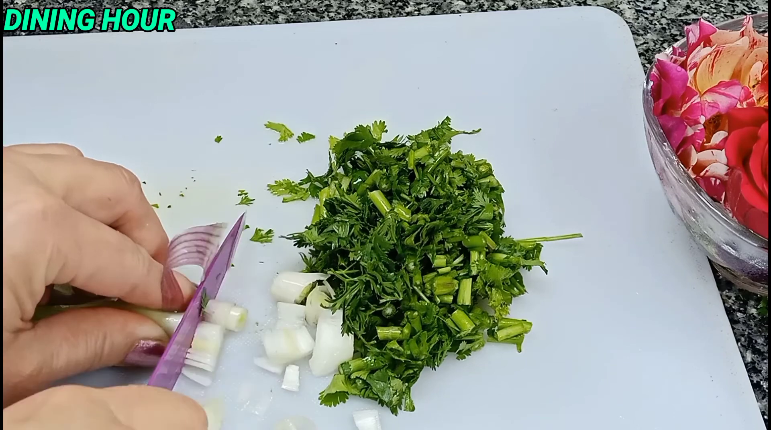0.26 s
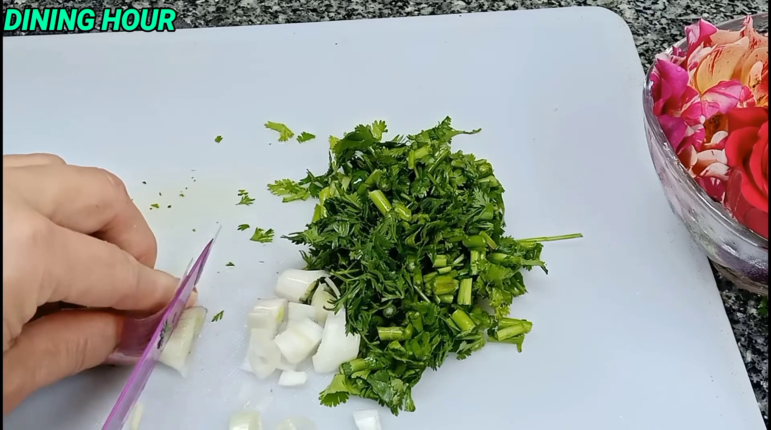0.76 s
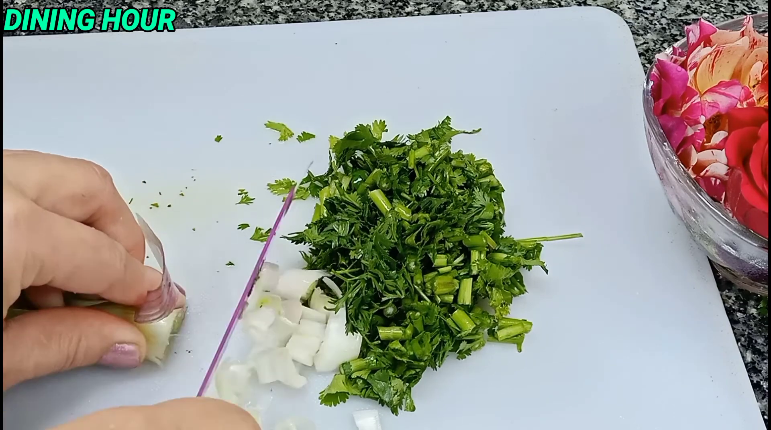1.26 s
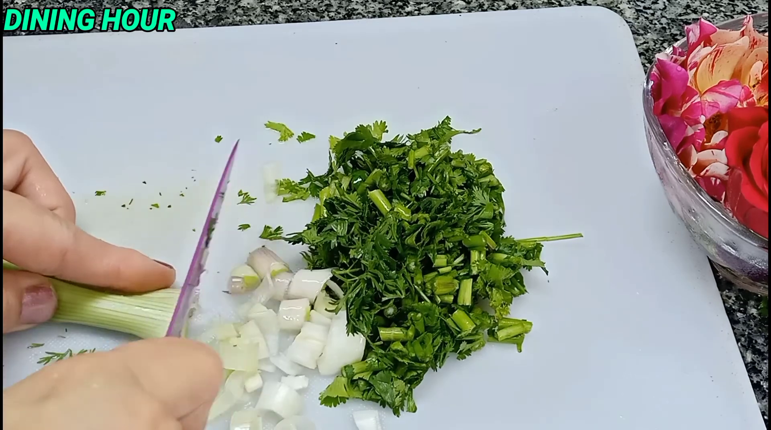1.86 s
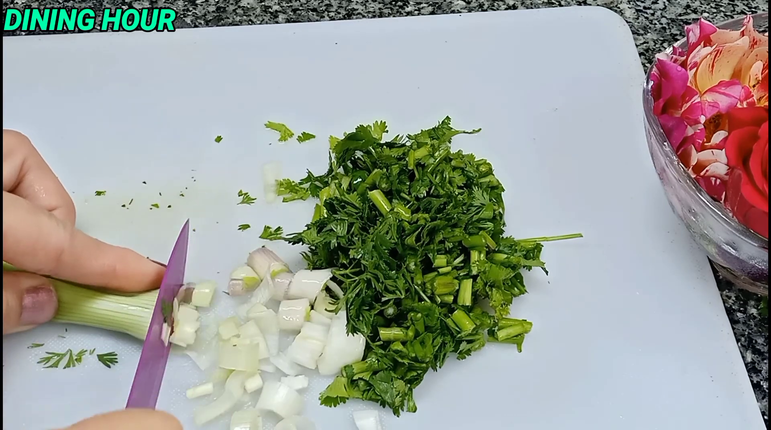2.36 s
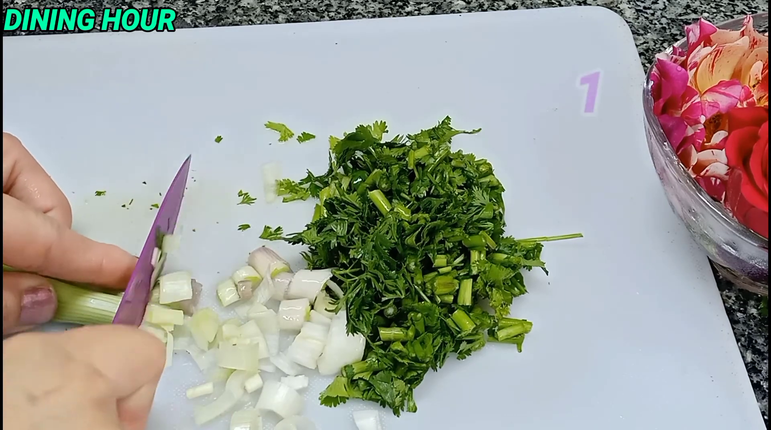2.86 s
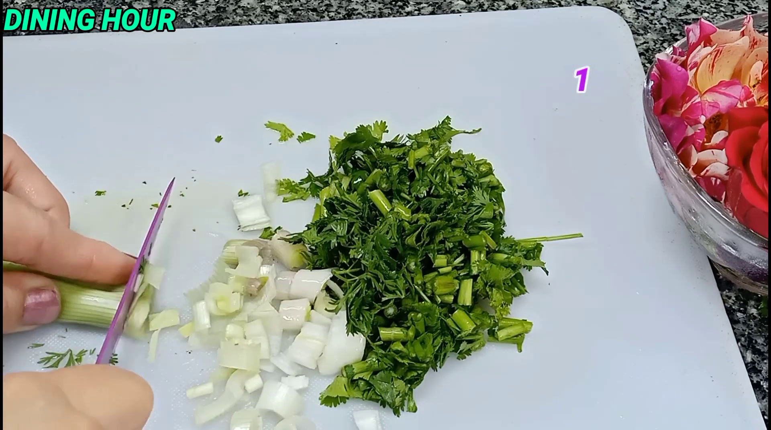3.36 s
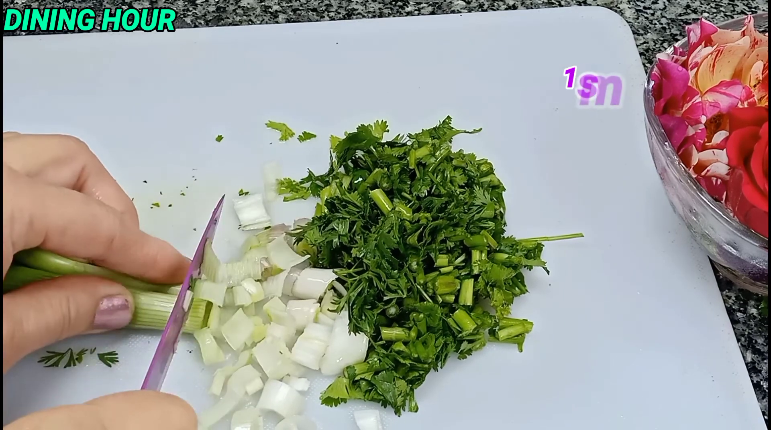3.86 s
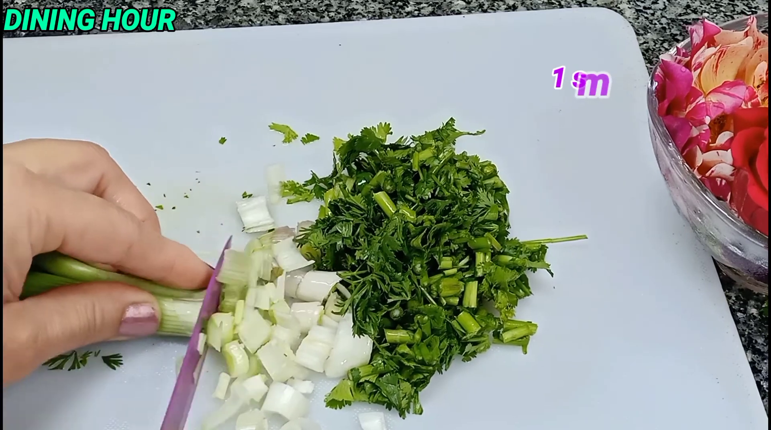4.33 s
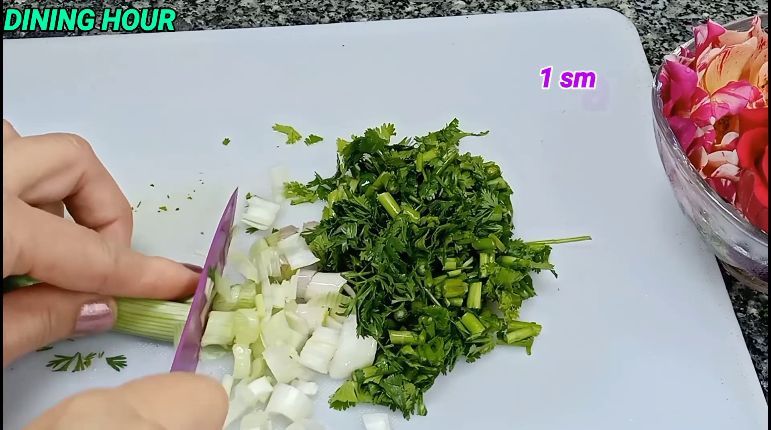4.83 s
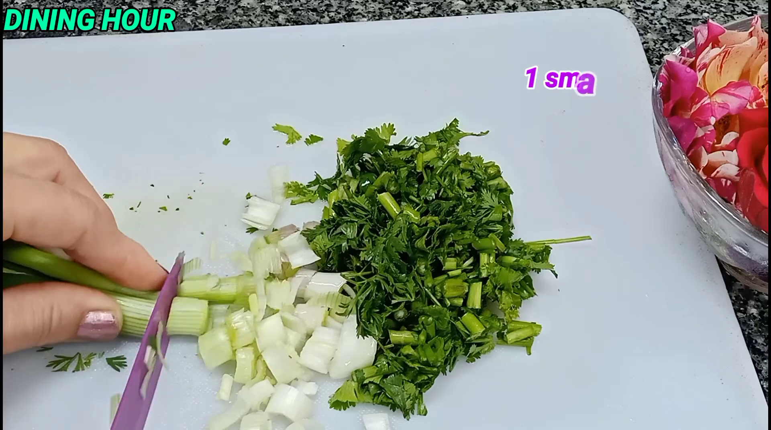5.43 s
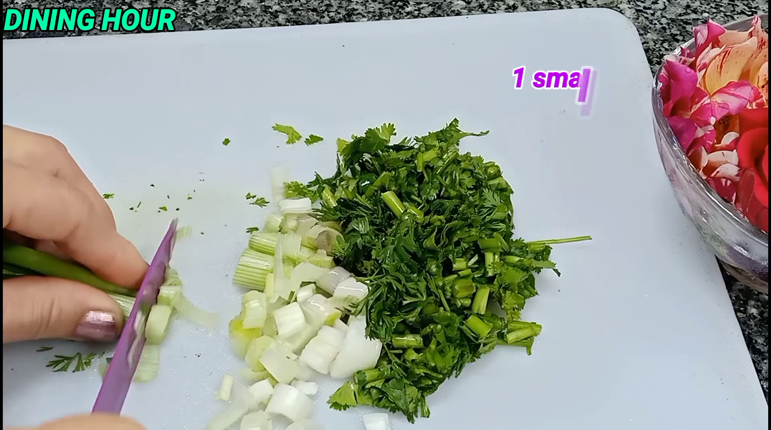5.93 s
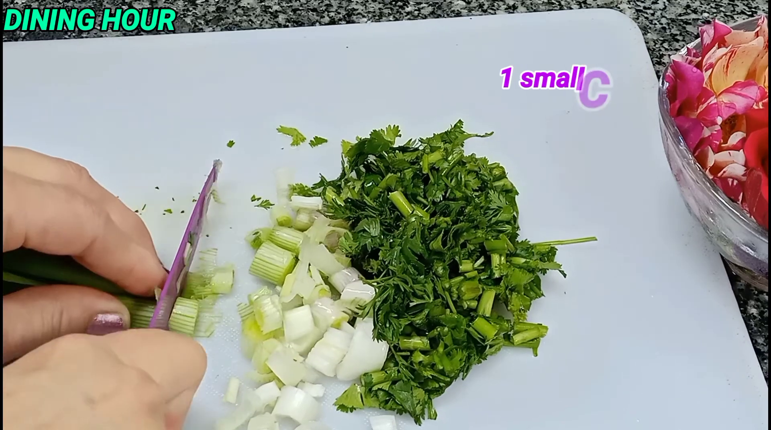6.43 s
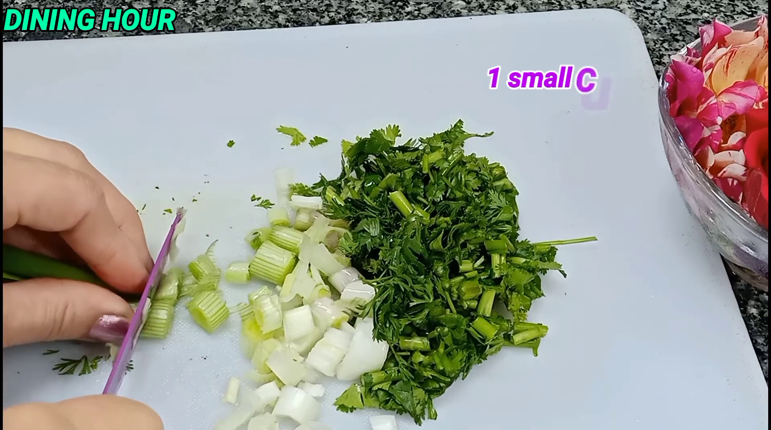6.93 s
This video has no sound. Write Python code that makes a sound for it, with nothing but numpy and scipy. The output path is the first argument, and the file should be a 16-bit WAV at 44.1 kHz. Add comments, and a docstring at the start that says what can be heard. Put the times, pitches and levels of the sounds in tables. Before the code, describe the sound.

A close stereo pickup in a small, hard kitchen, with quick reflections, a short tail, faint air and a low wavering hum. A light scrape at the very start leads to a crisp, crunchy cut with a hollow pop at 0.3 s and a softer, juicy one at 0.95. Scrapes follow at 0.6 and 1.3, then light rustles and ticks around 1.7 to 1.9. Cuts at 2.2, 2.9 and 4.2 end in sharp, bright knocks on plastic; the one at 3.5 snaps and pops hollowly. The loudest gritty squeak comes at 3.8, and the holding hand rumbles very faintly near 4. Steadier crunchy strokes follow at 4.7, 5.3, 5.9, 6.5 and 7.05, the 6.5 one strongest, with a bright hollow pop. Short scrapes at 5.6 and 6.2 and soft onion-skin rustles fill the gaps; the last cut lands just before the end.

```python
"""A knife slices spring onions on a plastic board: skin snaps and wet layers crunch as filtered bursts of noise.
Sine waves make the thud of the board and the pop of hollow stalks; short noise bursts make three sharp knocks.
Between cuts the edge grates as showers of clicks and squeaks as a ringing slip train; slices rustle.
The holding hand rumbles on the board. A small, hard kitchen adds close echoes and a dense noise tail.
Behind it all lie faint air noise and a low, wavering hum, both made of filtered noise."""
import sys
import numpy as np
from scipy import signal
from scipy.fft import rfft, irfft
from scipy.io import wavfile
from scipy.ndimage import uniform_filter1d

SR = 44100
rng = np.random.default_rng(int(sys.argv[2]) if len(sys.argv) > 2 else 0)


def wrap_up_sound(samples):
    """Save the sound to the file named by the first command line argument, as 16-bit audio."""
    columns = np.atleast_2d(samples).T
    # keep every value between -1 and 1, then stretch to whole-number steps
    tamed = np.clip(columns, -1, 1)
    steps = np.round(tamed * 32767).astype(np.int16)
    wavfile.write(sys.argv[1], SR, steps)


N = 317123  # length in samples

# Source levels below are those before the balance set in scene(). Colours give relative levels.
# The cuts. Each row: skin snap in seconds, blade landing in seconds, pressing time before the snap in seconds,
# pressing in dB, snap in dB, tearing in dB, landing snap in dB, landing crunch in dB,
# crunch hold time in seconds, landing thud in dB, juiciness in dB.
CUT_STROKES = [(.301, 0.3114, 0.11, -54.5, -22, -34, -19.5, -27, 0.027, -49.5, -2.5),
               (.951, 0.955, 0.1, -43.5, -19, -25, -29, -28, 0.023, -41, 0.5),
               (2.215, 2.227, .13, -43.5, -29, -27, -26.5, -28, 0.0063, -40.5, 3),
               (2.868, 2.881, 0.089, -42.5, -22.5, -27, -22.5, -40, 0.0032, -42.5, 2),
               (3.504, 3.524, 0.11, -48, -22, -36, -18.5, -23.5, 0.0043, -37, -3),
               (4.1868, 4.227, .15, -43, -24, -29.5, -29, -27.5, 0.0049, -40, -1),
               (4.7054, 4.735, 0.07, -41, -22, -34, -24, -28, .012, -45, 2),
               (5.26, 5.282, .11, -47.5, -27, -43, -19.5, -29, 0.024, -41.5, 2.5),
               (5.864, 5.8955, 0.043, -44.5, -27.5, -44.5, -18, -31.5, 0.031, -44.5, -1.5),
               (6.4814, 6.501, 0.078, -45.5, -20.5, -46, -15, -24.5, 0.021, -38.5, -5),
               (7.0534, 7.061, 0.14, -43.5, -19.5, -28.5, -20.5, -27.5, 0.026, -48.5, -4.5)]
# Colour of the bursting skin as the board answers. Each row: frequency in Hz, level in dB.
SNAP_BODY_COLOUR = [(30, -44.5), (100, -31), (250, -12), (480, -15.5), (760, -3), (920, -2.5), (1080, 3.5),
                    (1270, 0), (1500, -2.5), (2000, -0.5), (2750, 4), (4000, -7), (5500, -12.5),
                    (9000, -48)]
# Colour of the wet cells fizzing. Each row: frequency in Hz, level in dB.
FIZZ_COLOUR = [(2500, -22.5), (4500, -2), (5600, -7), (6600, 3), (7300, -2), (8300, -16.5), (10000, -27),
               (12300, -28.5), (14000, -25.5), (16000, -28.5)]
# Colour of the wet layers breaking. Each row: frequency in Hz, level in dB.
CRUNCH_COLOUR = [(30, -36), (100, -19), (260, -14), (600, -4), (950, -0.5), (1270, 3.5), (1550, 1.5),
                 (2600, 3.5), (4000, -2), (5500, -6), (6800, 0), (8300, -14), (10000, -21), (12300, -26.5),
                 (15000, -21)]
# Low modes of the board on the counter. Each row: frequency in Hz, level in dB, time to fall 60 dB in seconds.
BOARD_MODES = [(137.2, -2, 0.17), (156.8, 3.5, 0.12), (179.8, -2.5, .1), (308, -13, 0.21)]
# Short rings of blade and board under a cut. Each row: frequency in Hz, width in Hz, level in dB.
CUT_RINGS = [(389, 60, -5.5), (900, 74, -4.5), (1318, 39, -0.5), (2620, 260, -7)]
# Hollow stalks caving in under some cuts. Each row: start in seconds, level in dB, pitch in Hz.
STALK_POPS = [(.301, -29, 850), (.309, -32, 420), (3.505, -27, 930), (3.524, -33, 720), (6.501, -25, 1290)]
# Small snaps of single fibres and slices. Each row: start in seconds, level in dB.
FIBRE_TICKS = [(.263, -44), (1.66, -41), (1.774, -40), (2.486, -37.5), (3.133, -46), (3.499, -36),
               (3.671, -41.5), (4.029, -48), (5.578, -37.5), (6.408, -40.5)]
# The edge strikes the bare board. Each row: start in seconds, level in dB.
BOARD_KNOCKS = [(2.2295, -7.5), (2.8876, -8.5), (4.229, -11)]
# Colour of the edge striking plastic. Each row: frequency in Hz, level in dB.
KNOCK_COLOUR = [(30, -45), (100, -36), (300, -17), (580, -14), (850, -15.5), (1180, -8.5), (1300, -4),
                (1650, -1), (2050, 5), (2550, 3), (3500, -5.5), (5500, -14), (6900, -9.5), (9000, -30),
                (15000, -45.5)]
# The edge is dragged over the board to push slices aside, sometimes catching twice. Each row:
# start in seconds, hold time in seconds, level in dB, swell in dB, squeak pitch at the end of the hold in Hz.
BOARD_SCRAPES = [(.018, 0.033, -33.5, -2, 1070), (0.5952, 0.029, -25, 12, 1180),
                 (0.654, 0.022, -34, 3, 1184), (1.2842, 0.034, -29.5, 0, 1330),
                 (1.84, .014, -33.5, -3.5, 1623), (1.878, 0.03, -43.5, -2, 1340),
                 (2.57, .003, -32, 1, 1120), (3.1923, 0.042, -29, -0.5, 1496),
                 (3.779, .022, -25.5, 7.5, 1340), (3.822, 0.029, -18, 4, 1055),
                 (4.428, 0.082, -49.5, -3, 1030), (5.629, 0.039, -24.5, 7.5, 1316),
                 (6.16, 0.046, -34, 0, 1310), (6.22, 0.027, -25, 2, 1170)]
# Colour of the edge grating on plastic. Each row: frequency in Hz, level in dB.
SCRAPE_COLOUR = [(150, -43.5), (500, -33), (660, -14.5), (800, -21.5), (1030, -2.5), (1280, -0.5),
                 (1500, -11.5), (1720, 0), (2000, -9), (2400, -5), (3400, -15), (5200, -30), (6800, -27),
                 (10000, -65.5)]
# Stalk and slices rub on the rising blade and the fingers.
# Each row: peak in seconds, level in dB, rise and fall time in seconds, brightness in dB per octave.
SOFT_RUBS = [(.53, -41.5, 0.029, 1), (.75, -56, 0.0052, 8), (1.165, -41, 0.029, 2.5),
             (1.662, -36.5, .016, 1), (1.71, -37.5, 0.012, .5), (1.785, -43, 0.019, 1),
             (2.41, -40.5, 0.028, 3), (2.505, -39.5, .014, 4.5), (3.076, -37, 0.017, 2.5),
             (3.149, -45, 0.022, 2), (3.705, -37.5, 0.018, 1.5), (4.389, -41.5, 0.048, 1.5),
             (4.89, -49.5, 0.037, 5), (4.995, -42, 0.031, 3), (5.504, -41.5, 0.02, 0.5),
             (6.092, -36.5, .017, -1), (6.693, -37, .014, 0), (6.796, -36.5, 0.016, -2),
             (6.91, -49, 0.0086, 10)]
# Colour of rubbing onion skin. Each row: frequency in Hz, level in dB.
RUSTLE_COLOUR = [(150, -17), (450, -20), (800, -7.5), (1200, -0.5), (1700, 1.5), (2400, 3.5), (3500, -3.5),
                 (5300, -9.5), (7000, -6), (8300, -21.5), (10000, -27.5), (12300, -34), (15000, -28)]
# The holding hand shifts its weight on the board. Each row: peak in seconds, level in dB,
# rise time in seconds, fall time in seconds, brightness in dB per octave.
HAND_SHIFTS = [(3.97, -55, 0.044, 0.029, -8), (4.12, -53, 0.042, 0.13, -1.5), (4.36, -59, .07, 0.32, 2)]
# Colour of the hand on the board. Each row: frequency in Hz, level in dB.
HAND_COLOUR = [(30, -23), (60, -9.5), (80, 2.5), (125, -11), (200, -11.5), (320, -9.5), (600, -17),
               (2000, -60)]
# Reflections from counter, bowl and wall, one list for the left port and one for the right.
# Each row: delay in seconds, relative gain.
NEAR_ECHOES = [
    [(.00075, 0.3), (.0015, 0.78), (.00225, 0.69), (.00385, 0.25), (.0064, 0.16)],
    [(.0008, 0.25), (.002, 0.36), (.0032, 0.16), (.0056, 0.18), (.0069, 0.33)],
]
# How fast the kitchen tail dies. Each row: frequency in Hz, time to fall 60 dB in seconds.
TAIL_T60 = [(120, 0.31), (400, 0.47), (1100, 0.43), (2300, 0.39), (6500, 0.37), (12000, 0.29)]
# How strong the kitchen tail is. Each row: frequency in Hz, level in dB.
TAIL_LEVEL = [(120, -2), (400, -2), (1100, -4.5), (2300, -9), (6500, -7), (14000, -10.5)]
# How alike scattered sound is at the two ports. Each row: frequency in Hz, left-right likeness as a fraction.
LIKENESS = [(60, 1), (160, 0.95), (300, 0.77), (700, 0.09), (1400, 0.11), (16000, 0.046)]
# Difference in colour between the ports. Each row: frequency in Hz, left minus right in dB.
LEFT_MINUS_RIGHT = [(60, -3), (160, -0.5), (400, 3.5), (700, 3), (950, -0.5), (1400, 0.5), (4000, 0.5),
                    (5600, 3), (7000, 0), (10500, -4), (13500, -7)]
# Colour of the room air. Each row: frequency in Hz, level in dB.
AIR_COLOUR = [(25, -28), (60, -11.5), (100, -4), (170, -9), (400, -10.5), (1100, -17), (3000, -26),
              (7000, -22.5), (8500, -45.5), (16000, -69.5)]
# Colour of the hum. Each row: frequency in Hz, level in dB.
HUM_COLOUR = [(40, -47.5), (70, -9.5), (88, -7.5), (98, 6), (108, -11.5), (135, -13), (220, -54)]
# The hum wavers over time. Each row: time in seconds, level in dB.
HUM_CURVE = [(0.0, -74.5), (3.24, -73), (3.58, -63.5), (5.89, -68), (6.05, -64.5), (6.87, -70), (7.19, -65)]

HZ = np.fft.rfftfreq(4096, 1 / SR)  # frequency grid of the colour filters
OCTAVES = np.log2(np.clip(HZ, 700, 7000) / 2000)  # octaves from 2000 Hz, held flat outside 700 to 7000 Hz
PRESS_SWELL_DB, PRESS_TILT = 13.5, 6.1  # the stalk hisses more as the blade bears down: dB, dB per octave
# Juicy stalks crunch brighter: dB per octave, and the same per dB of juiciness.
CRUNCH_TILT, TILT_PER_JUICE_DB = 2.56, 0.37
# Soft thuds: as the blade settles on the stalk (dB), and as the skin gives (dB relative to the snap).
SETTLE_DB, RECOIL_DB = -64, -26
POP_RISE_S, POP_FALL_S = .0008, .004  # the wet wall damps the tube within a few cycles
TICK_FIZZ_DB = 2.5  # the juiciness setting given to a tick's snap
BITE_S, LET_GO_S = 0.0023, 0.0095  # attack and release of a scrape
SAG_OCTAVES_PER_S = 3.1  # the squeak sinks as the edge leans in
SQUEAK_WIDTH_HZ = 230
CATCH_DB = -2  # tick of the edge catching, relative to the start of its scrape
# Slices are swept along just ahead of the edge: seconds, dB relative to the scrape less half its swell, dB per octave.
SWEEP_LEAD_S, SWEEP_DB, SWEEP_TILT = .025, -15.5, 0.3
CEILING = 1.05  # amplitude that loud peaks are rounded towards
EDGE_HZ = 15900  # upper band limit


def gain_of(db):
    """Turns decibels into amplitude."""
    return 10 ** (np.asarray(db) / 20)


def evened(x):
    """Scales a sound to an rms of 1."""
    return x / np.sqrt(np.mean(x ** 2) + 1e-20)


def with_energy(x, energy):
    """Scales a sound to a given sum of squares."""
    return x * np.sqrt(energy / (np.sum(x ** 2) + 1e-20))


def read(points, hz):
    """Reads values between the rows of a table, on a log-frequency axis."""
    f, value = np.transpose(points)
    return np.interp(np.log(hz + 1), np.log(f + 1), value)


def add(mix, s, sound):
    """Mixes a sound in at time s, leaving out whatever falls outside the mix."""
    start = round(s * SR)
    part = mix[max(start, 0):][:len(sound) + min(start, 0)]
    part += sound[max(-start, 0):][:len(part)]


def coloured(x, db):
    """Filters a sound with the gains db on the grid HZ; it rings only after the input, as real objects do."""
    log_gain = np.log(gain_of(np.r_[db, db[-2:0:-1]]))
    # the Hilbert transform supplies the phase of a filter that responds as early as it can
    response = np.exp(np.conj(signal.hilbert(log_gain)))[:len(HZ)]
    return signal.fftconvolve(x, irfft(response))


def whitened(x, size):
    """Evens out the broad peaks and dips of a short random burst; size is the smoothing in bins."""
    power = uniform_filter1d(abs(rfft(x, 2 * len(HZ) - 2)) ** 2, size)
    return coloured(x, -10 * np.log10(abs(power) + 1e-9))[:len(x)]


def resonate(x, hz, width):
    """Rings a resonance whose pitch follows the curve hz; a larger width in Hz dies faster."""
    turn = np.exp(2j * np.pi * np.cumsum(hz) / SR)
    r = np.exp(-np.pi * width / SR)
    return 2 * (turn * signal.lfilter([1 - r], [1, -r], x / turn + 1e-18)).real


def cuts():
    """The blade settles and presses, skin snaps, layers tear, then it lands with a snap, a crunch and a thud."""
    hiss, crisp, bass = np.zeros((3, N))
    for (snap_s, land_s, press_s, press_db, snap_db, tear_db,
         land_db, crunch_db, crunch_s, thud_db, juice_db) in CUT_STROKES:
        bearing = press(press_s, attack_s=.004, release_s=.02, swell_db=PRESS_SWELL_DB)
        add(bass, snap_s - press_s, gain_of(SETTLE_DB) * thud())
        add(hiss, snap_s - press_s, gain_of(press_db) * rustle(bearing, PRESS_TILT))
        add(crisp, snap_s, gain_of(snap_db) * snap(juice_db))
        add(bass, snap_s, gain_of(snap_db + RECOIL_DB) * thud())
        add(crisp, snap_s, gain_of(tear_db) * crunch(land_s - snap_s, juice_db))
        add(crisp, land_s, gain_of(land_db) * snap(juice_db))
        add(crisp, land_s, gain_of(crunch_db) * crunch(crunch_s, juice_db))
        add(bass, land_s, gain_of(thud_db) * thud())
    return hiss, crisp, bass


def press(hold_s, attack_s, release_s, swell_db=0):
    """Pressure of the blade: it bites, swells ever faster, and lets go after the hold."""
    t = np.arange(0, hold_s + 5 * release_s, 1 / SR)
    bite = 1 - np.exp(-t / attack_s)
    swell = gain_of(swell_db * (np.minimum(t / hold_s, 1) ** 2 - 1))
    return bite * swell * np.exp(-np.maximum(t - hold_s, 0) / release_s)


def snap(fizz_db):
    """The taut skin bursts: the board answers in the mids, the wet cells fizz on top."""
    push = coloured(crack(fall_s=0.0013, splinter=1.46), read(SNAP_BODY_COLOUR, HZ))
    spray = coloured(crack(fall_s=0.001, splinter=14.0), read(FIZZ_COLOUR, HZ))
    body = gain_of(-0.5) * with_energy(push, SR / 250)
    fizz = gain_of(fizz_db - 5) * with_energy(spray, SR / 250)
    return body + fizz


def crack(fall_s, splinter):
    """One sharp break, then splintering that dies away after it."""
    t = np.arange(SR // 30) / SR
    force = with_energy(rng.standard_normal(len(t)) * np.exp(-t / fall_s), splinter ** 2)
    force[0] += 1
    return whitened(force, size=45)


def crunch(hold_s, juice_db):
    """The wet layers fracture one after another."""
    pressure = press(hold_s, attack_s=0.0017, release_s=0.0066)
    tilt = CRUNCH_TILT + TILT_PER_JUICE_DB * juice_db
    return friction(pressure, CRUNCH_COLOUR, tilt, per_s=1200, spread_db=3.5, haze=0.39)


def friction(pressure, colour, tilt, per_s, spread_db, haze):
    """Tiny slips or fractures follow the pressure and sound through a colour tilted in dB per octave."""
    force = pressure * grains(len(pressure), per_s, spread_db, haze)
    sound = coloured(force, read(colour, HZ) + tilt * OCTAVES)
    return with_energy(sound, np.sum(pressure ** 2))


def grains(size, per_s, spread_db, haze):
    """Tiny fractures of uneven strength over a haze of noise standing for still smaller ones."""
    strength = gain_of(spread_db * np.minimum(rng.exponential(1, size), 3))
    happens = rng.random(size) < per_s / SR
    clicks = strength * rng.choice([-1, 1], size) * happens
    return evened(clicks) + haze * rng.standard_normal(size)


def thud(rise_s=0.0093, spread=0.028):
    """The board's low modes ring, tuned a little differently for every thud."""
    t = np.arange(SR // 3) / SR
    detune = 1 + spread * rng.standard_normal(len(BOARD_MODES))
    ring = np.zeros(len(t))
    for (hz, level, t60), factor in zip(BOARD_MODES, detune):
        ring += gain_of(level - 60 * t / t60) * np.sin(2 * np.pi * hz * factor * t)
    return with_energy(ring * (1 - np.exp(-t / rise_s)), SR / 50)


def ringing(x):
    """Every fracture also sets blade and board ringing for a few hundredths of a second."""
    return x + sum(gain_of(db) * resonate(x, np.full(N, hz), width) for hz, width, db in CUT_RINGS)


def pops():
    """The air in the tube of a stalk rings for a few cycles."""
    out, t = np.zeros(N), np.arange(SR // 20) / SR
    shape = (1 - np.exp(-t / POP_RISE_S)) * np.exp(-t / POP_FALL_S)
    for s, db, hz in STALK_POPS:
        ring = np.sin(2 * np.pi * hz * t) * shape
        add(out, s, gain_of(db) * with_energy(ring, SR / 250))
    return out


def ticks():
    """Single fibres and slices break with small snaps."""
    out = np.zeros(N)
    for s, db in FIBRE_TICKS:
        add(out, s, gain_of(db) * snap(TICK_FIZZ_DB))
    return out


def knocks(chatter_s):
    """The edge breaks through and chatters for a moment on the hard plastic."""
    out = np.zeros(N)
    u = np.arange(SR // 30) / SR / chatter_s
    for s, db in BOARD_KNOCKS:
        force = whitened(u * np.exp(-u) * rng.standard_normal(len(u)), size=25)
        knock = coloured(force, read(KNOCK_COLOUR, HZ))
        add(out, s, gain_of(db) * with_energy(knock, SR / 220))
    return out


def scrapes(grit_db, squeak_db, tilt_per_octave, neutral_hz):
    """The edge catches, grates and squeaks, sweeping slices along; higher squeaks have brighter grit."""
    out = np.zeros(N)
    for s, length, db, swell_db, hz in BOARD_SCRAPES:
        pressure = press(length, BITE_S, LET_GO_S, swell_db)
        t = np.minimum(np.arange(len(pressure)) / SR, length + LET_GO_S)
        pitch = hz * 2 ** (SAG_OCTAVES_PER_S * (length - t))
        tilt = tilt_per_octave * np.log2(hz / neutral_hz)
        grit = friction(pressure, SCRAPE_COLOUR, tilt, per_s=1100, spread_db=4.0, haze=.6)
        tick = coloured(crack(fall_s=.002, splinter=1.5), read(SCRAPE_COLOUR, HZ) + tilt * OCTAVES)
        catch = with_energy(tick, SR / 250)
        tone = squeak(pressure, pitch, slips_per_s=330, jitter=.35, width_hz=SQUEAK_WIDTH_HZ)
        sweep = rustle(press(SWEEP_LEAD_S + length, attack_s=0.0087, release_s=0.015), SWEEP_TILT)
        add(out, s, gain_of(db - swell_db + CATCH_DB) * catch)
        add(out, s, gain_of(db + grit_db) * grit)
        add(out, s, gain_of(db + squeak_db) * tone)
        add(out, s - SWEEP_LEAD_S, gain_of(db + SWEEP_DB - swell_db / 2) * sweep)
    return out


def squeak(pressure, pitch, slips_per_s, jitter, width_hz):
    """The wet edge sticks and slips in an uneven train that rings the blade."""
    gap, strength = rng.standard_normal((400, 2)).T
    at = np.cumsum(np.exp(jitter * gap) * SR / slips_per_s).astype(int)
    slips = np.bincount(at - at[0], np.exp(0.23 * strength), len(pressure))[:len(pressure)]
    jolts = np.diff(slips * pressure, prepend=0)
    ring = resonate(resonate(jolts, pitch, width_hz), pitch, width_hz)
    return with_energy(ring, np.sum(pressure ** 2))


def rustles():
    """Soft rubs fade as fast as they swell."""
    out = np.zeros(N)
    for s, db, width_s, tilt in SOFT_RUBS:
        lead_s, pressure = brush(width_s, width_s)
        add(out, s - lead_s, gain_of(db) * rustle(pressure, tilt))
    return out


def rustle(pressure, tilt):
    """Onion skin rubs on blade, fingers or other slices in a shower of tiny slips."""
    return friction(pressure, RUSTLE_COLOUR, tilt, per_s=760, spread_db=4.5, haze=0.59)


def brush(rise_s, fall_s):
    """A passing touch: the time it takes to reach its peak, and the pressure that swells and fades."""
    t = np.arange(-3 * rise_s, 4 * fall_s, 1 / SR)
    return -t[0], np.exp(np.minimum(t / rise_s, -t / fall_s))


def hand():
    """The holding hand rumbles on the board as it shifts."""
    out = np.zeros(N)
    for s, db, rise_s, fall_s, tilt in HAND_SHIFTS:
        lead_s, pressure = brush(rise_s, fall_s)
        rumble = friction(pressure, HAND_COLOUR, tilt, per_s=300, spread_db=-0.5, haze=.7)
        add(out, s - lead_s, gain_of(db) * rumble)
    return out


def in_turn(x, space, turn_s, count):
    """Fades the sound in turn through several random sets of echoes, so no single set colours the whole scene."""
    angle = np.pi * np.arange(N) / SR / turn_s
    shares = np.array([np.cos(angle - np.pi * k / count) ** 4 for k in range(count)])
    shares = shares / np.linalg.norm(shares, axis=0)  # the squared shares always sum to 1
    return sum(space(x * share) for share in shares)


def worktop(x, scatter, scatter_s, lag_s):
    """Direct sound, a little later on the right, with near reflections and scatter from hands and bowl."""
    t = np.arange(SR // 20) / SR
    cloud = port_pair(rng.standard_normal((2, len(t)))) * np.exp(-t / scatter_s)
    out = []
    for delay, echoes, diffuse in zip((0, lag_s), NEAR_ECHOES, cloud):
        path = with_energy(diffuse, scatter ** 2)
        for s, gain in [(0.000075, 0.82)] + list(echoes):  # the direct sound comes first
            add(path, s + delay, np.array([gain]))
        path = with_energy(whitened(path, size=35), 0.97)
        out.append(signal.oaconvolve(x, path)[:N])
    return np.array(out)


def kitchen(x, onset_s):
    """A dense tail from tiles and cupboards, each band dying at its own speed."""
    hz, t, z = signal.stft(port_pair(rng.standard_normal((2, SR))), SR, nperseg=256)
    t60 = read(TAIL_T60, hz)[:, None]
    decay = gain_of(read(TAIL_LEVEL, hz)[:, None] - 60 * t / t60)
    # the root makes up for slow bands otherwise gathering more energy
    z = z * decay * np.sqrt(2 * np.log(1000) / (t60 * SR))
    tail = signal.istft(z, SR, nperseg=256)[1]
    tail_t = np.arange(tail.shape[1]) / SR
    tail = tail * (1 - np.exp(-(tail_t / onset_s) ** 2))
    return signal.fftconvolve(x[None], tail, axes=1)[:, :N]


def port_pair(x):
    """Makes two unrelated channels alike in the bass, as at two close ports."""
    size = x.shape[1]
    left, other = rfft(x)
    same = np.clip(read(LIKENESS, np.fft.rfftfreq(size, 1 / SR)), -1, 1)
    right = same * left + np.sqrt(1 - same ** 2) * other
    return irfft(np.array([left, right]), size)


def background(air_db, hum_db):
    """Faint room air and a low, wavering hum, both filtered noise."""
    level = np.interp(np.arange(N) / SR, *np.transpose(HUM_CURVE))
    return gain_of(air_db) * steady(AIR_COLOUR) + gain_of(hum_db + level) * steady(HUM_COLOUR)


def steady(colour):
    """Even background noise of a given colour."""
    white = port_pair(rng.standard_normal((2, N)))
    return evened(np.array([coloured(side, read(colour, HZ))[:N] for side in white]))


def scene():
    """Cutting, scraping and rustling on the board, heard in the kitchen."""
    hiss, crisp, bass = cuts()
    cut = gain_of(-1.72) * ringing(crisp + ticks()) + pops()
    knock = knocks(chatter_s=0.00085)
    scrape = scrapes(grit_db=-1.5, squeak_db=-5.5, tilt_per_octave=8.4, neutral_hz=1350)
    rub = hiss + rustles()
    contact = cut + knock + scrape + rub
    # the board's bass is too long a wave for near objects to scatter, but it does fill the room
    radiated = cut + knock + gain_of(-1.0) * scrape + gain_of(2) * rub + bass
    near = in_turn(contact, lambda x: worktop(x, scatter=1.0, scatter_s=0.0066, lag_s=0.00014),
                   turn_s=1.702, count=3)
    far = in_turn(radiated, lambda x: kitchen(x, onset_s=0.0028), turn_s=.9, count=3)
    return near + bass + hand() + far + background(air_db=-67.5, hum_db=4.0)


def record(dry):
    """Each port has its own colour; loud peaks are rounded off; then the treble is cut at the band limit."""
    lean = read(LEFT_MINUS_RIGHT, HZ) / 2
    ports = np.array([coloured(dry[0], lean)[:N], coloured(dry[1], -lean)[:N]])
    ports = ports / (1 + (ports / CEILING) ** 4) ** .25
    low_pass = signal.firwin(511, EDGE_HZ, window=("kaiser", 9), fs=SR)
    return signal.oaconvolve(ports, low_pass[None], "same")


dry = scene()
out = record(dry)
wrap_up_sound(out)
```